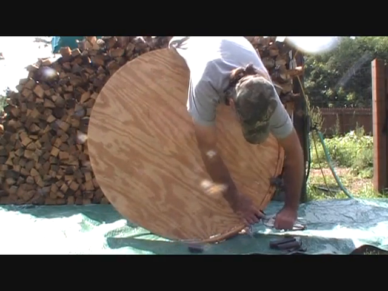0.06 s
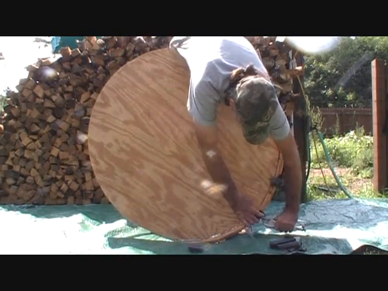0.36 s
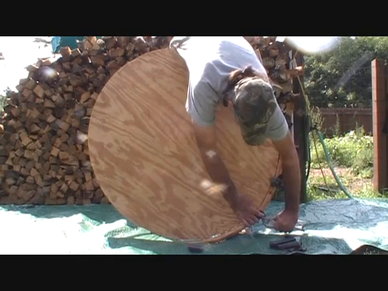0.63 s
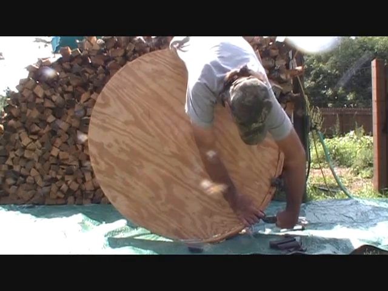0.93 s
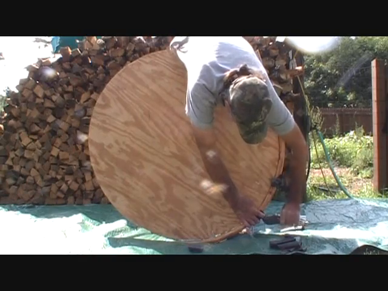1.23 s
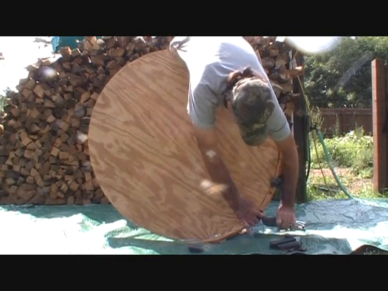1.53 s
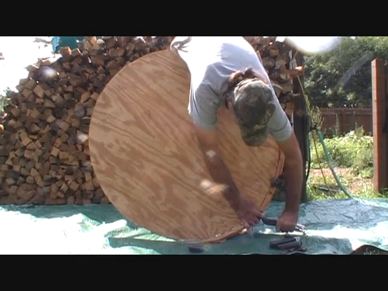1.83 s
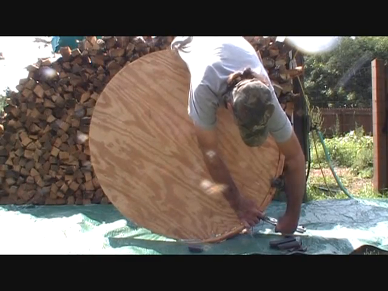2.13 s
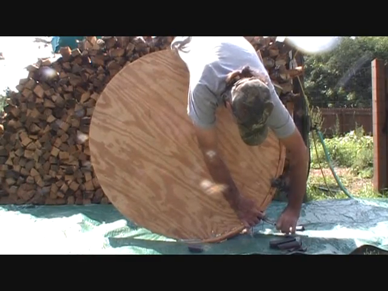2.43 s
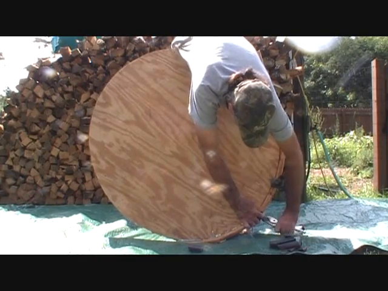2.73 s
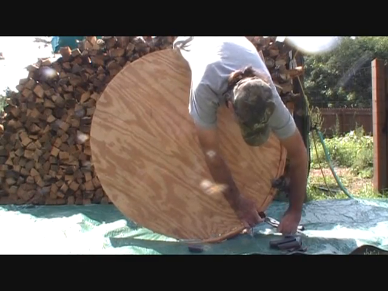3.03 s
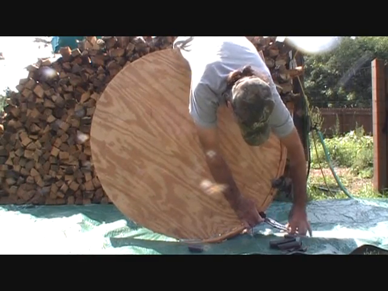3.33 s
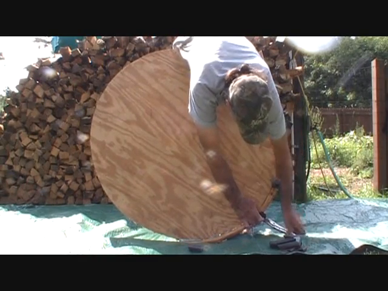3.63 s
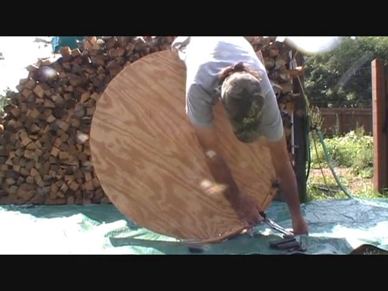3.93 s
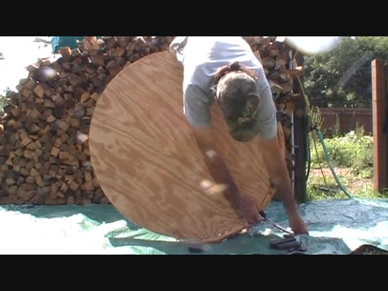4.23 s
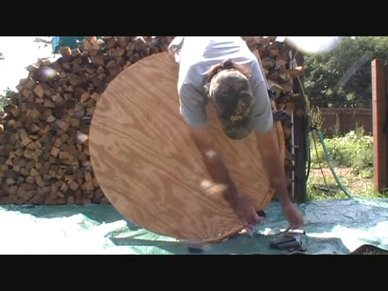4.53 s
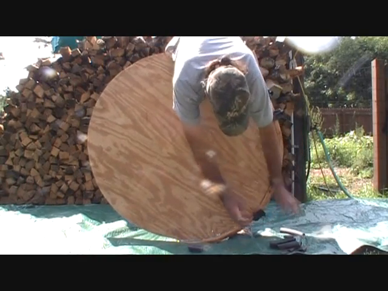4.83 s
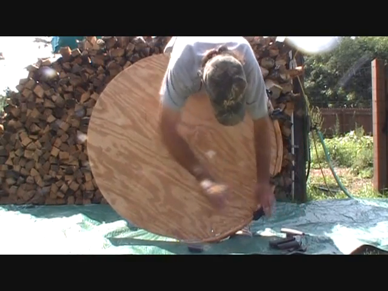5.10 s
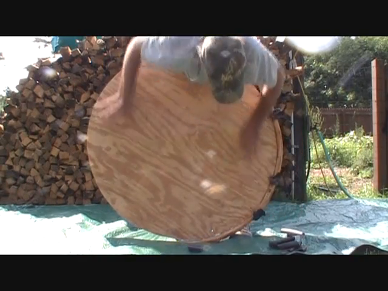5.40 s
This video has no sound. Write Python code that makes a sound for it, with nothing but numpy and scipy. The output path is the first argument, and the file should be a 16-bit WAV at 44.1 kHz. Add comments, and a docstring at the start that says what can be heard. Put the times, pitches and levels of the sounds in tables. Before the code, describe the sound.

A quiet summer garden: high, rapidly pulsing crickets chirp throughout with brief pauses, over soft air hiss and the low hum of distant traffic. A far vehicle swells faintly around 1 second, and a few distant birds call, hoarsely at first, between 0.4 and 2.9 seconds. From about 2.3 to 2.8 seconds, a few metres away, wire tightens around a sapling with small ticks and a brief drag over bark, ending in one sharper tick. Soft scuffs and taps follow from 3.3 seconds. At about 4.3 to 4.4 seconds, pliers clack brightly onto other metal tools, the loudest moment, with lighter clinks until 4.9. Hollow bumps on a plywood disc come around 4.5 and 5 seconds, the latter with a crisp tarpaulin crackle. The blows carry only a very short echo. Faint tarpaulin rustling continues to about 5.7 seconds as the worker gets up.

```python
"""In a summer garden crickets chirp over distant traffic; a far vehicle passes and a few birds call.
A few metres away someone ties a bent sapling to a plywood disc: the wire tightens by stick and slip,
ticking and dragging over the bark. Hands and shoes then scuff over wood and a tarpaulin, bumps ring
the disc, and pliers clack onto other tools, each blow echoed briefly by a woodpile.
Last, the tarpaulin rustles as the worker gets up."""
import sys
import numpy as np
from scipy import signal
from scipy.fft import rfft, irfft, next_fast_len
from scipy.io import wavfile
from scipy.ndimage import uniform_filter1d

SR = 44100
rng = np.random.default_rng(int(sys.argv[2]) if len(sys.argv) > 2 else 0)


def master_out(mix):
    """Clip the mix to full scale and print it as 16-bit PCM to the path in sys.argv[1]."""
    frames = np.transpose(np.atleast_2d(mix))
    ceiling = np.clip(frames, -1, 1)
    pcm = np.round(ceiling * 32767).astype(np.int16)
    wavfile.write(sys.argv[1], SR, pcm)


N = 249586
TIME = np.arange(N) / SR
HIT_TIME = TIME[:SR // 4]


def undb(db):
    """Amplitude ratio of a level in decibels."""
    return 10 ** (np.asarray(db) / 20)


def unit(x):
    """Normalisation to rms 1."""
    return x / np.sqrt(np.mean(x ** 2))


def curves(table):
    """Linear interpolation of each column over time."""
    s, *columns = np.transpose(table)
    return [np.interp(TIME, s, c) for c in columns]


def shape(x, gain):
    """Filtering as multiplication of the spectrum by gain(frequency)."""
    n = next_fast_len(x.shape[-1])
    hz = np.fft.rfftfreq(n, 1 / SR) + 1e-6
    return irfft(rfft(x, n) * gain(hz), n)[..., :x.shape[-1]]


def colour(x, points):
    """Spectral envelope through (frequency [Hz], gain [dB]) points on a logarithmic axis."""
    hz, db = np.transpose(points)
    return shape(x, lambda f: undb(np.interp(np.log(f), np.log(hz), db)))


def resonate(x, hz, width):
    """Response of a damped resonator, gain 1 at its centre."""
    return shape(x, lambda f: 1 / (1 + 1j * (f / hz - hz / f) * hz / width))


def band(x, hz, width):
    """Band-pass of two equal resonators in cascade."""
    return resonate(resonate(x, hz, width), hz, width)


def wander(rate):
    """Smooth random fluctuation with a spread near 1 and `rate` new values a second."""
    k = int(SR / rate)
    return uniform_filter1d(np.repeat(rng.standard_normal(N // k + 2), k), k)[:N]


def noise(size=N):
    """Uncorrelated white noise, left and right."""
    return rng.standard_normal((2, size))


def grains(per_s, spread_db):
    """Friction as a Poisson train of tiny slips of uneven size."""
    size = undb(spread_db * np.minimum(rng.exponential(size=N), 4)) * rng.choice([-1, 1], N)
    return size * (rng.random(N) < per_s / SR)


def add(track, s, sound):
    """Superposition of a sound on a track from time s on."""
    i = max(int(s * SR), 0)
    track[..., i:i + sound.shape[-1]] += sound[..., :max(N - i, 0)]


def ring(modes, ratio=1, scatter=.016):
    """Free vibration: a sum of damped modes, slightly different on every blow."""
    out = np.zeros(len(HIT_TIME))
    for k, (hz, db, t60) in enumerate(modes):
        stray_db, detune = rng.standard_normal(2)
        phase = 2 * np.pi * hz * ratio * (1 + scatter * detune) * HIT_TIME + np.pi * k
        out += undb(db + stray_db - 60 * HIT_TIME / t60) * np.sin(phase)
    return out


def add_hit(track, s, sound, db, echo_db, delay_s=.0065):
    """Direct sound of a blow (level over 10 ms) and its diffuse reflection off the woodpile's logs."""
    sound = unit(sound) * undb(db) * np.sqrt(SR / 100 / len(HIT_TIME))
    logs = noise(len(HIT_TIME)) * np.exp(-HIT_TIME / .0033)
    echo = signal.fftconvolve(sound[None], logs / np.sqrt(np.sum(logs ** 2) / 2), axes=1)
    add(track, s, sound)
    add(track, s + delay_s, undb(echo_db) * echo)


def garden(x, pan_db, near_db, far_db):
    """Scattering: early off disc and ground, later off fence and trees. Positive pan favours the left."""
    response = 0
    for t60, db in ((.025, near_db), (.22, far_db)):
        tail = noise(len(HIT_TIME)) * undb(-60 * HIT_TIME / t60) * (HIT_TIME > .001)
        response += undb(db) * tail / np.sqrt(np.sum(tail ** 2) / 2)
    left = shape(x[0], lambda f: np.exp(-2j * np.pi * f * 17e-6))  # 17 microseconds late
    scattered = signal.fftconvolve(x, response, axes=1)[:, :N]
    return (np.array([left, x[1]]) + scattered) * undb([[pan_db / 2], [-pan_db / 2]])


# ticks of the wire, one followed by its sharp echo
# (time [s], level [dB], pitch [ratio], overtones [dB], treble [dB])
WIRE_TICKS = [(1.378, -61, 1.7, -8, 3), (2.32, -54.5, 1, -8, -2), (2.3263, -38.5, 1.084, -4.5, 2.5),
              (2.3368, -43, 1.06, -11, 8), (2.4547, -50, 1.46, -13, 20), (2.636, -54, 1.01, -12, -8),
              (2.7508, -30, 1.06, -5.5, -9)]
# low, middle and high modes of wire and sapling (frequency [Hz], level [dB], T60 [s])
WIRE_MODES = [(1150, -22, .025), (1610, 0, .018), (1770, -2, .013), (2000, -3, .010)]
WIRE_OVERTONES = [(2300, 0, .008), (2650, -3, .008), (2972, -5, .013), (3250, -5, .009)]
WIRE_TREBLE = [(6130, -10, .022), (7800, 14, .0036), (7500, -2, .017), (8700, -4, .014)]
# spectrum of the snap (frequency [Hz], level [dB])
WIRE_SNAP = [(400, -9), (1500, -12), (3400, 0), (5000, -5), (7500, 7), (10000, 0), (16000, -8)]


def wire(snap_db=4, echo_db=-18):
    """Stick-slip excitation: wire and sapling ring together, a woody note under a metallic tick."""
    out = np.zeros((2, N))
    for s, db, ratio, overtones_db, treble_db in WIRE_TICKS:
        snap = colour(noise(len(HIT_TIME))[0], WIRE_SNAP) * np.exp(-HIT_TIME / .0022)
        # brighter ticks carry more of the broadband snap
        tick = unit(ring(WIRE_TREBLE)) + undb(treble_db / 2 + snap_db) * unit(snap)
        note = unit(ring(WIRE_MODES, ratio)) + undb(overtones_db) * unit(ring(WIRE_OVERTONES, ratio))
        add_hit(out, s, note + undb(treble_db) * unit(tick), db, echo_db)
    return garden(out, pan_db=1.6, near_db=-12, far_db=-17.5)


# drag of the wire (start [s], end [s], centre [Hz], bandwidth [Hz], level [dB])
WIRE_RUB = (2.39, 2.51, 3000, 2200, -62)


def wire_rub():
    """Sliding friction: the wire drags over the bark in uneven little slips before it catches."""
    start, end, hz, width, db = WIRE_RUB
    slips = unit(band(grains(per_s=1700, spread_db=1), hz, width))
    window = np.exp(-((2 * TIME - start - end) / (end - start)) ** 8)
    drag = slips * window * undb(db + 2 * wander(60))
    return garden(np.array([drag, drag]), pan_db=0, near_db=-10, far_db=-16)


# impacts on other tools (time [s], level [dB], chatter decay [s], tilt [dB/octave],
# note frequency [Hz], relative note level [dB], note T60 [s])
CLACKS = [(4.3352, -23, 0.0038, 2.5, 3360, -9, 0.016), (4.346, -34, 0.01, -4, 4500, -4, .016),
          (4.388, -34, 0.0052, -1, 4520, -8, .01), (4.3912, -18.5, 0.0022, -1.5, 11050, -2, 0.011),
          (4.4, -31.5, 0.0078, 1.5, 8580, -7, .035), (4.459, -45.5, 0.025, -6, 2120, -2, .012),
          (4.5132, -41, 0.0032, 0.5, 8200, -2, .015), (4.5191, -43, 0.0039, 2, 6470, 2, 0.022),
          (4.618, -44.5, 0.0088, 3, 5300, -4, 0.022), (4.803, -36, 0.0067, 2, 8660, 6, 0.024),
          (4.8872, -47.5, 0.0011, -2, 6900, 8, 0.0065)]
# spectrum of the chattering jaws (frequency [Hz], level [dB])
CHATTER = [(300, -8), (1100, -12), (2200, -5.5), (3600, 3), (5000, 1.5), (6500, 1.5), (8200, 11),
           (9400, 3.5), (11200, 2), (16000, -7)]
# modes of the pliers (frequency [Hz], level [dB], T60 [s])
STEEL_MODES = [(1750, -13, .012), (2550, -9, .008), (3700, 3, .011), (4520, -1, .011), (5000, -2, .009),
               (6050, -2, .014), (7580, -3, .014), (7950, -1, .011), (8580, 5, .017), (9410, -3, .016),
               (10200, 2, .016), (11000, 0, .014), (12700, -3, .016), (14800, -8, .014)]


def pliers(chatter_db=4, echo_db=-14):
    """Impact of steel on steel: the jaws chatter and ring, and the tool struck adds its own note."""
    out = np.zeros((2, N))
    for s, db, chatter_s, tilt_db, note_hz, note_db, note_t60 in CLACKS:
        contacts = np.tanh(unit(colour(noise(len(HIT_TIME))[0], CHATTER)))
        chatter = contacts * np.exp(-HIT_TIME / chatter_s)
        jaws = ring(STEEL_MODES, scatter=.002) * (1 - np.exp(-HIT_TIME / .0003))
        note = ring([(note_hz, 0, note_t60)], scatter=.002)
        clack = unit(jaws) + undb(chatter_db) * unit(chatter)
        clack = colour(np.roll(clack, 8), [(1000, -3 * tilt_db), (16000, tilt_db)])
        add_hit(out, s, np.sqrt(2) * unit(clack) + undb(note_db) * unit(note), db, echo_db)
    return garden(out, pan_db=-3, near_db=-15, far_db=-20.5)


# bumps of disc and sapling (time [s], level [dB], favoured frequency [Hz])
KNOCKS = [(3.712, -50, 693), (4.3475, -46.5, 320), (4.487, -48, 805), (4.497, -44.5, 760),
          (4.505, -40, 727), (4.511, -52, 258), (4.549, -49.5, 255), (4.9575, -42.5, 645),
          (4.964, -39.5, 544), (4.977, -44, 398), (5.075, -58, 1220), (5.178, -50.5, 340)]
# modes of the plywood and the ground beneath (frequency [Hz], bandwidth [Hz], level [dB])
PLYWOOD_MODES = [(200, 45, -7), (300, 60, -5), (365, 45, 1), (565, 42, 0), (727, 50, 2), (930, 170, -6),
                 (1220, 150, -4), (1690, 2000, -11)]


def knocks(contact_s=.00027, falloff_db_per_octave=7, echo_db=-11):
    """Modal response of plywood: the spot struck favours some modes, and broader ones decay sooner."""
    out = np.zeros((2, N))
    for s, db, favoured_hz in KNOCKS:
        modes = []
        for hz, width, mode_db in PLYWOOD_MODES:
            octaves = abs(np.log2(hz / favoured_hz))
            t60 = np.log(1000) / (np.pi * width)
            modes.append((hz, mode_db - falloff_db_per_octave * octaves, t60))
        add_hit(out, s, ring(modes) * (1 - np.exp(-HIT_TIME / contact_s)), db, echo_db)
    return garden(out, pan_db=4, near_db=-19.5, far_db=-13)


# light contacts (time [s], level [dB], centre [Hz])
TAPS = [(3.712, -53, 1380), (3.7225, -55, 900), (3.726, -54.5, 2600), (3.773, -61, 1500),
        (3.941, -62.5, 13900), (4.021, -64, 13000), (4.21, -66, 14000), (4.549, -55, 1290),
        (4.57, -69, 3500), (4.73, -55.5, 1390), (4.959, -50, 7000), (4.966, -42, 7040), (5.0727, -49, 2110),
        (5.2067, -50.5, 4100)]


def taps(decay_s=.0019, width_ratio=1.65, echo_db=-9):
    """Heavily damped impacts: fingers, wire ends and tarpaulin creases tap without a pitch."""
    out = np.zeros((2, N))
    for s, db, hz in TAPS:
        burst = noise(len(HIT_TIME))[0] * np.exp(-HIT_TIME / decay_s)
        add_hit(out, s, band(burst, hz, hz * width_ratio), db, echo_db)
    return garden(out, pan_db=-1, near_db=-12, far_db=-18)


# scuffs of hands, shoes and sapling (time [s], swell time [s], wood level [dB], crackle level [dB])
SCUFFS = [(2.5, 0.06, -59, -70), (3.357, 0.069, -57.5, -56.5), (3.727, 0.017, -53, -58),
          (3.99, 0.067, -60.5, -63.5), (4.505, 0.0112, -40.5, -48), (4.692, 0.019, -54.5, -46.5),
          (4.803, 0.015, -50.5, -50.5), (4.923, 0.0079, -52, -68), (4.959, 0.0057, -36.5, -30),
          (5.184, 0.011, -51.5, -58), (5.38, 0.053, -79, -63), (5.593, 0.0081, -59, -49)]
# the worker reaches, shifts and gets up (start [s], end [s], wood level [dB], crackle level [dB])
MOVES = [(3.42, 3.69, -63, -64), (4.5, 5.02, -58, -62.5), (5.02, 5.2, -65, -64), (5.22, 5.7, -71, -64)]


def rubbing_power(fall_ratio=1.9, edge_s=.04, surge_db=2.3):
    """Incoherent addition: powers of brief scuffs and surging moves sum, on wood and on tarpaulin."""
    strokes = []
    for s, swell_s, *levels in SCUFFS:
        slope_s = np.where(TIME < s, swell_s, swell_s * fall_ratio)
        strokes.append((np.exp(-np.abs(TIME - s) / slope_s), levels))
    surge = undb(surge_db * wander(30))
    for start, end, *levels in MOVES:
        hold = (np.tanh((TIME - start) / edge_s) - np.tanh((TIME - end) / edge_s)) / 2
        strokes.append((hold * surge, levels))
    return sum(np.outer(undb(levels), stroke) ** 2 for stroke, levels in strokes)


def plywood(force):
    """Forced vibration: the disc's modes respond as parallel resonators of alternating sign."""
    return sum((-1) ** k * undb(db) * resonate(force, hz, width)
               for k, (hz, width, db) in enumerate(PLYWOOD_MODES))


# spectrum of the tarpaulin's crackle (frequency [Hz], level [dB])
CRACKLE = [(300, 1), (1200, 4), (2500, 0.5), (5000, -0.5), (7500, 8), (11000, 4.5), (16000, -10)]


def scuffs(apart_db=-5):
    """Friction noise: dense slips drum on the plywood and crackle in the tarpaulin."""
    wood_power, crackle_power = rubbing_power()
    slips = grains(per_s=6000, spread_db=1)
    body = plywood(slips * np.sqrt(wood_power)) / np.std(plywood(slips))
    # the sheet is wide: part of its crackle reaches only one side
    shared, left, right = (unit(colour(grains(per_s=7700, spread_db=3), CRACKLE)) for _ in range(3))
    crackle = np.array([np.roll(shared, 1), shared]) + undb(apart_db) * np.array([left, right])
    tarpaulin = crackle * np.sqrt(crackle_power) * undb([[-1], [1]])
    return garden(np.array([body, body]), pan_db=1, near_db=-4.5, far_db=-6) + tarpaulin


# runs of wing strokes (start [s], end [s], stroke rate [1/s], starting level [dB])
CRICKET_RUNS = [(.041, .69, 16.13, -53.5), (.724, 1.84, 15.68, -53.3), (2.243, 2.77, 16.18, -57.5),
                (2.799, 3.02, 16.18, -55.3), (3.051, 4.27, 15.93, -52.3), (4.313, 5.66, 15.9, -54)]


def near_cricket(top_hz=8370, rise_hz=330, drop_hz=1050, sag_db_per_s=1, uneven_db=1.4, rasp=.4):
    """Stridulation: pitch follows wing speed, rising in each stroke and then hooking downward."""
    u = np.linspace(-1, 1, int(.022 * SR))  # position within a stroke
    hz = top_hz - np.where(u < 0, rise_hz, drop_hz) * u ** 2
    out, teeth = np.zeros(N), np.tile(wander(900), 2)
    for start, end, rate, start_db in CRICKET_RUNS:
        for s in np.arange(start, end, 1 / rate):
            detune, size = rng.standard_normal(2)
            db = start_db - sag_db_per_s * (s - start) + uneven_db * size
            phase = 2 * np.pi * np.cumsum(hz * (1 + .006 * detune)) / SR
            tone = np.sin(phase + rasp * teeth[int(s * SR):][:len(u)])
            add(out, s - len(u) / SR / 2, tone * np.sqrt(1 - u ** 2) * undb(db))
    return garden(np.array([out, out]), pan_db=-3, near_db=-12, far_db=-14)


# a second cricket's bouts (start [s], end [s], trill rate [1/s], level [dB])
TRILL_BOUTS = [(.2, 1.3, 3.88, -64), (1.68, 3, 3.4, -67.5), (3.85, 4.4, 4.4, -67)]


def far_crickets(chorus_hz=8450, chorus_db=-65.5, trill_hz=9130, trill_s=.045):
    """Amplitude-modulated narrow-band noise: a wavering chorus in the grass and one cricket's trills."""
    chorus = unit(band(noise(), chorus_hz, width=1200)) * undb(chorus_db + wander(16))
    bouts = sum(undb(db) * np.exp(-np.abs((TIME - s) / trill_s) ** 4)
                for start, end, rate, db in TRILL_BOUTS for s in np.arange(start, end, 1 / rate))
    return chorus + unit(band(noise(), trill_hz, width=380)) * bouts


# far calls (time [s], frequency [Hz], level [dB], hoarseness [0-1], tree echo [dB])
BIRD_CALLS = [(.435, 1385, -58, .9, 3.5), (1.152, 1345, -57, .9, 1), (1.66, 1710, -63.5, .3, -6),
              (1.675, 2290, -64, .25, -6), (1.8, 1700, -65, .3, -6), (1.81, 2280, -65, .25, -6),
              (2.84, 2290, -67, .3, -8)]


def birds(note_s=.091, waver=.008, arch=.065, trees_t60=1.3):
    """Modulated tones: arched calls, hoarse with jitter and a subharmonic throb, echo among trees."""
    direct, to_trees = np.zeros((2, N))
    u = np.linspace(-1, 1, int(note_s * SR))
    for s, hz, db, rough, trees_db in BIRD_CALLS:
        pitch = hz * (1.012 - arch * u ** 2 + waver * wander(140)[:len(u)])
        phase = 2 * np.pi * np.cumsum(pitch) / SR + rough * wander(260)[:len(u)]
        throb = 1 + rough ** 2 / 2 * np.cos(phase / 3)
        call = undb(db) * (1 - u ** 2) * np.sin(phase) * throb
        add(direct, s - note_s / 2, call)
        add(to_trees, s - note_s / 2, undb(trees_db) * call)
    trees = noise(SR) * undb(-60 * TIME[:SR] / trees_t60) * (TIME[:SR] > .03)
    echo = signal.fftconvolve(to_trees[None], trees / np.linalg.norm(trees[0]), axes=1)[:, :N]
    leaf_flutter = np.cos(wander(120)) * undb(2 * wander(35))
    return direct + leaf_flutter * echo


# a far vehicle (closest approach [s], swell time [s], centre [Hz], bandwidth [Hz], level [dB])
PASSING = (1.15, .45, 290, 100, -60.5)


def passing_vehicle():
    """A moving source: its band of noise swells on approach and fades with distance."""
    s, swell_s, hz, width, db = PASSING
    return unit(band(noise(), hz, width)) * undb(db) * np.exp(-((TIME - s) / swell_s) ** 2)


# tone of a distant engine (time [s], frequency [Hz], rms level [dB])
ENGINE = [(0.15, 203.3, -61.5), (.6, 202.9, -58.5), (1.5, 201.5, -59.5), (2.1, 200.9, -61.5),
          (2.51, 198.6, -64), (3.95, 201.4, -65.5), (4.84, 202.5, -66), (5.0, 198.7, -72)]


def engine_and_hum(hum_hz=124, hum_db=-62):
    """Slow modulation of pitch and level: a far engine's tone drifts above a low, wavering hum."""
    hz, db = curves(ENGINE)
    amplitude = np.sqrt(2) * undb(db + .84 * wander(8.1))
    engine = amplitude * np.sin(2 * np.pi * np.cumsum(hz + .34 * wander(4.3)) / SR)
    hum_phase = 2 * np.pi * np.cumsum(hum_hz + 3 * wander(6)) / SR
    return engine + undb(hum_db + 3 * wander(5.6)) * np.sin(hum_phase)


# spectrum of the outdoor air (frequency [Hz], relative spectral density [dB])
AIR = [(15, -40), (28, -15), (60, -5), (105, 0.5), (175, -8), (290, -11.7), (450, -17.3), (800, -22),
       (1500, -24.7), (4000, -31.5), (7000, -33.8), (8300, -32), (9900, -39.5), (16000, -45.5)]
# stereo width of the air (frequency [Hz], side minus mid [dB])
AIR_WIDTH = [(30, 3), (70, -8.5), (180, 1), (400, 5), (700, 7), (1500, 3), (8000, 3.5), (15000, -0.5)]
# swells of the traffic rumble (time [s], gain [dB])
RUMBLE = [(0, -3.5), (1.05, 0.5), (1.8, -4), (2.4, 0.5), (4.3, -2), (4.9, 1), (5.66, -2.5)]


def ambience(air_db=-54.3, crossover_hz=380):
    """Diffuse noise field: wide, soft hiss over a slowly swelling traffic rumble."""
    mid, side = noise()
    air = colour(mid + colour(side, AIR_WIDTH) * [[1], [-1]], AIR)
    air *= undb(air_db) / np.std(air.mean(axis=0))
    rumble = shape(air, lambda f: 1 / (1 + (f / crossover_hz) ** 4))
    hiss = (air - rumble) * undb(.5 * wander(.67))
    return hiss + rumble * undb(curves(RUMBLE)[0] + .24 * wander(15))


def scene():
    """Superposition of the handiwork, the animals and the distant background."""
    handiwork = wire() + wire_rub() + pliers() + taps() + knocks() + scuffs()
    animals = near_cricket() + far_crickets() + birds()
    return handiwork + animals + passing_vehicle() + engine_and_hum() + ambience()


def record(dry):
    """Band limiting: a steep elliptic low-pass cuts the treble above 16 kHz."""
    return signal.sosfilt(signal.ellip(8, .2, 70, 16000, fs=SR, output="sos"), dry)


dry = scene()
out = record(dry)
master_out(out)
```